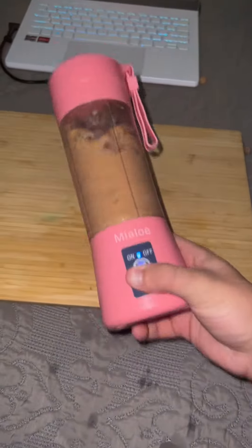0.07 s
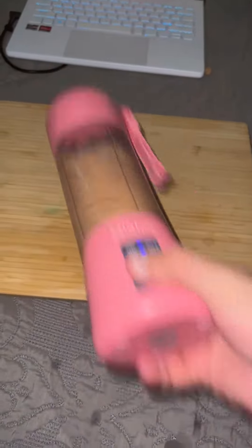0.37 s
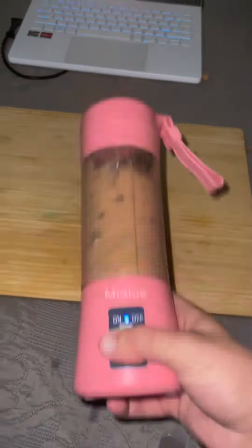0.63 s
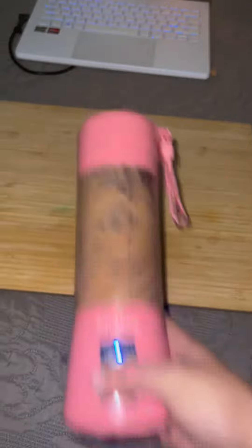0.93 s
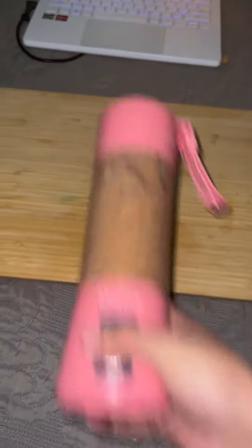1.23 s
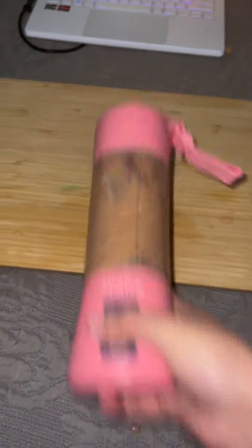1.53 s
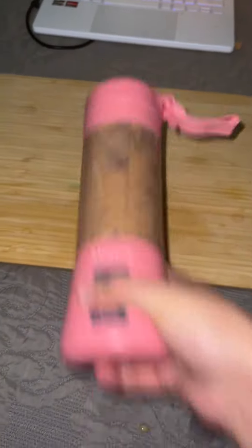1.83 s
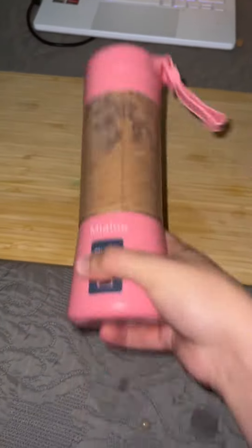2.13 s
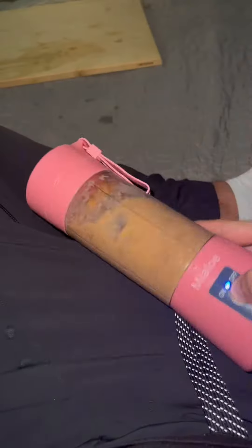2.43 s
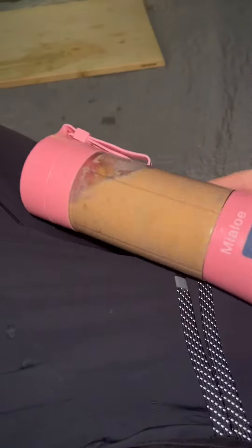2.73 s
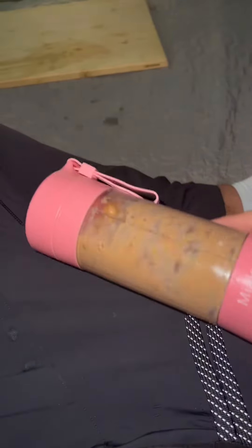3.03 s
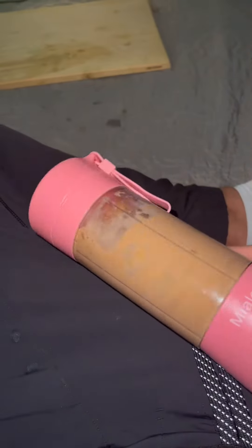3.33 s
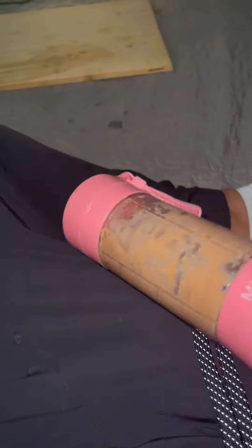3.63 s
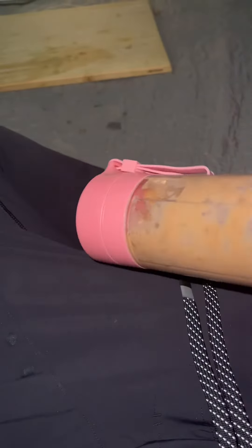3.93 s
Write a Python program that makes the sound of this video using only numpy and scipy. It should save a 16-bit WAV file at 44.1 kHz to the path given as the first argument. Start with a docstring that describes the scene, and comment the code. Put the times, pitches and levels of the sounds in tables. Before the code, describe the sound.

A portable blender bottle is shaken, thick drink sloshing and hard bits rattling inside.

```python
"""Shaking a portable blender bottle

A thick drink with hard bits is shaken upright; then, after a split second of silence, the scene changes to the
bottle churning on its side. The bits tick and knock on the plastic wall, the liquid splashes, and air pockets
gulp with a falling pitch. Near the end the churning eases and the jar rings thinly. The room rumbles faintly
underneath."""
import sys
import numpy as np
from scipy import signal
from scipy.fft import rfft, irfft
from scipy.io import wavfile

SR = 44100
rng = np.random.default_rng(int(sys.argv[2]) if len(sys.argv) > 2 else 0)


def master_out(mix):
    """Clip the mix to full scale and print it as 16-bit PCM to the path in sys.argv[1]."""
    frames = np.transpose(np.atleast_2d(mix))
    ceiling = np.clip(frames, -1, 1)
    pcm = np.round(ceiling * 32767).astype(np.int16)
    wavfile.write(sys.argv[1], SR, pcm)


N = 176400

UPRIGHT_END_S, TILTED_START_S = 2.339, 2.351
SPLASH_RISE_S, SPLASH_DECAY_S = 0.00099, 0.0032
# how hard the liquid sloshes: t/s, level/dB
SLOSH_STRENGTH = [(0.0, -33.5), (0.05, -28.5), (0.399, -29.5), (0.439, -36), (0.649, -25.5), (0.768, -34.5),
                  (0.868, -31), (0.888, -26), (1.048, -28), (1.088, -50.5), (1.117, -37), (1.147, -45),
                  (1.167, -36.5), (1.297, -26), (1.417, -35), (1.497, -32), (1.586, -28.5), (1.656, -29.5),
                  (1.686, -44.5), (1.706, -30), (1.766, -35.5), (1.906, -26.5), (2.015, -26.5),
                  (2.065, -38.5), (2.085, -30), (2.674, -25.5), (2.82, -28), (2.96, -26.5), (3.023, -28),
                  (3.118, -26), (3.143, -20.5), (3.163, -29), (3.263, -27), (3.283, -42), (3.312, -25),
                  (3.532, -29.5), (3.582, -22.5), (3.632, -40.5), (3.751, -33), (3.791, -41),
                  (3.931, -31.5), (3.991, -39)]


def amp(db):
    """Turns decibels into a gain."""
    return 10 ** (np.asarray(db) / 20)


def unit(x):
    """Scales a signal to an average power of one."""
    return x / np.sqrt(np.mean(x ** 2) + 1e-20)


def read(points, hz):
    """Reads between the rows of a table, with octaves evenly spaced."""
    f, v = np.transpose(points)
    return np.interp(np.log(hz + 1), np.log(f + 1), v)


def loudness(points):
    """Turns rows of time and decibels into a gain for every sample."""
    return amp(np.interp(np.arange(N) / SR, *np.transpose(points)))


def add(mix, start_s, sound):
    """Mixes a sound in at the given time."""
    part = mix[..., max(round(start_s * SR), 0):][..., :sound.shape[-1]]
    part += sound[..., :part.shape[-1]]


def colour(x, points, low_hz=1, high_hz=1e6):
    """Shapes the tone by a table and steeply removes what lies outside the two limits."""
    hz = abs(np.fft.fftfreq(4096, 1 / SR)) + 1
    gain = amp(read(points, hz)) / np.sqrt((1 + (low_hz / hz) ** 8) * (1 + (hz / high_hz) ** 8))
    log_gain = np.log(np.maximum(gain, 1e-5))
    taps = np.fft.ifft(np.exp(np.conj(signal.hilbert(log_gain)))).real  # rings only after a hit
    return signal.fftconvolve(x, unit(taps)[None] / np.sqrt(len(taps)), axes=1)[:, :N]


def by_position(x, upright, tilted, **limits):
    """The jar gives one tone upright and another on its side."""
    is_upright = np.arange(N) / SR < TILTED_START_S
    return np.where(is_upright, colour(x, upright, **limits), colour(x, tilted, **limits))


def even(x, smooth_s=0.063):
    """Evens out slow swells in loudness while the fine grain stays."""
    window = np.hanning(int(2 * smooth_s * SR))
    power = signal.fftconvolve(np.mean(unit(x) ** 2, 0), window / window.sum(), "same")
    return unit(x / np.sqrt(abs(power) + 0.13))


def flutter(rate_hz, depth_db):
    """A gain that wavers at random, up to about the given rate."""
    hz = np.fft.rfftfreq(N, 1 / SR)
    slow = unit(irfft(rfft(rng.standard_normal(N)) * np.exp(-(hz / rate_hz) ** 2), N))
    return unit(amp(depth_db * np.clip(slow, -2, 2)))


def scatter(per_s, spread_db):
    """Irregular events, as rows of t/s, gain and two random numbers for varying the sound."""
    draws = rng.standard_normal((2000, 4))
    times = (np.arange(len(draws)) + draws[:, 0]) / per_s
    sizes = amp(spread_db * np.clip(draws[:, 1], -2, 1.6))
    return np.column_stack([times, sizes, draws[:, 2:]])[(times > 0) & (times < N / SR)]


def narrow_noise(hz, width_hz):
    """Rubbing noise gathered around one pitch."""
    f = np.fft.rfftfreq(N, 1 / SR)
    return unit(irfft(rfft(rng.standard_normal((2, N))) / (1 + ((f - hz) / width_hz) ** 2), N))


def burst(rise_s, decay_s, hz, peak_db, octaves=0.37):
    """A brief crack of noise, strongest around hz, in two rows: direct and scattered sound."""
    t, f = np.arange(1024) / SR, np.fft.rfftfreq(1024, 1 / SR) + 1
    bump = unit(amp(peak_db * np.exp(-(np.log2(f / hz) / octaves) ** 2)))
    since_peak = t - 2 * rise_s
    envelope = np.exp(np.minimum(2 * since_peak / rise_s, -since_peak / decay_s))
    crack = irfft(rfft(rng.standard_normal((2, len(t)))) * bump) * envelope
    return crack / np.linalg.norm(crack, axis=1, keepdims=True) * np.linalg.norm(envelope)


def room_rumble():
    """The room's faint, steady, low noise."""
    # tone of the rumble: f/Hz, level/dB
    rumble_tone = [(30, -22), (80, -3), (200, -13), (1000, -38)]
    return amp(-56.5) * unit(colour(rng.standard_normal((2, N)), rumble_tone))


def sliding_hiss():
    """The contents slide along the wall with a soft hiss that swells near the end."""
    swell = np.interp(np.arange(N) / SR, [3.82, 3.915, 4.04], [0, 1, 0])
    return amp(-34) * swell * narrow_noise(hz=4500, width_hz=260)


def jar_ringing(start_s=3.63, fade_in_s=0.063):
    """The slowing contents rub the jar and bring out its own notes."""
    # notes of the jar: f/Hz, width/Hz, level/dB relative to the slosh
    jar_notes = [(468, 36, -6), (695, 45, -8), (1050, 110, -9), (1870, 55, -5)]
    rub = loudness(SLOSH_STRENGTH) * np.clip((np.arange(N) / SR - start_s) / fade_in_s, 0, 1)
    return rub * sum(amp(db) * even(narrow_noise(hz, width)) for hz, width, db in jar_notes)


def gulp(hz, rise_s=0.001853, decay_s=0.003, fall_s=0.004):
    """An air pocket rings for a few cycles while its pitch drops through hz."""
    t = np.arange(2048) / SR
    since_peak = t - 2 * rise_s
    cycles = np.cumsum(hz * np.exp(-0.4 * np.tanh(since_peak / fall_s))) / SR
    envelope = np.minimum(t / rise_s, 1) * np.exp(-np.maximum(since_peak, 0) / decay_s)
    return envelope * np.sin(2 * np.pi * (cycles + rng.random((2, 1))))


def small_gulps(typical_hz=547.6):
    """Many small air pockets gulp, more often while the bottle is upright."""
    upright, tilted = scatter(per_s=130, spread_db=2.5), scatter(per_s=42, spread_db=2.5)
    events = np.vstack([upright[upright[:, 0] < TILTED_START_S], tilted[tilted[:, 0] >= TILTED_START_S]])
    out = np.zeros((2, N))
    for at, size, pitch, _ in events:
        add(out, at, size * gulp(typical_hz * np.exp(0.32 * max(pitch, -0.7))))
    return out


def big_gulps(jar_hz=466):
    """Big air pockets sound the jar's hollow note and thump it; their wall slaps are returned apart."""
    # the biggest gulps: t/s, level/dB, f/Hz
    pockets = [(0.2712, -16, 760), (0.5803, -11.5, 650), (0.6215, -14.5, 945), (0.6377, -10.5, 557),
               (0.6508, -13, 573), (0.8764, -9, 637), (0.8997, -14.5, 560), (0.9222, -12, 900),
               (0.9696, -14.5, 615), (1.2987, -15, 650), (1.9257, -18.5, 830), (2.4132, -14, 473),
               (2.482, -19, 457), (2.586, -17, 462), (2.61, -10.5, 442), (2.6662, -13.5, 500),
               (2.7166, -17, 450), (2.788, -18, 360), (2.822, -22, 370), (3.1285, -9.5, 530),
               (3.136, -11.5, 965), (3.191, -15, 476), (3.2188, -16.5, 426), (3.5252, -16.5, 490),
               (3.5781, -16.5, 485)]
    # tone of a gulp's push on the jar: f/Hz, level/dB
    thump_tone = [(60, -28), (170, -12.5), (260, 6.5), (1000, -4)]
    gulps, slaps = np.zeros((2, 2, N))
    for at, db, hz in pockets:
        add(gulps, at, amp(db - 2.5) * gulp(hz))
        slap_db = 2 * db + 5  # a bigger gulp slaps much harder
        add(slaps, at, amp(slap_db) * burst(SPLASH_RISE_S, SPLASH_DECAY_S, hz=1110, peak_db=4))
    hollow_note = signal.lfilter(*signal.iirpeak(jar_hz, Q=12, fs=SR), gulps)
    thumps = amp(-9.5) * colour(slaps, thump_tone, high_hz=1330)
    return gulps + hollow_note + thumps, slaps


def liquid_splashes(typical_hz=3400):
    """The drink breaks into short splashes, some dull and some bright."""
    out = np.zeros((2, N))
    for at, size, _, brightness in scatter(per_s=85, spread_db=1.8):
        hz = typical_hz * np.exp(0.68 * brightness)
        add(out, at, size * burst(SPLASH_RISE_S, SPLASH_DECAY_S, hz, peak_db=5))
    return out


def liquid_slosh(churn, splashes, ticks, gulps):
    """The low voice of the moving drink: muffled churning with small gulps in it."""
    # tone of the liquid in the jar, upright and on its side: f/Hz, level/dB
    upright = [(71, -41), (120, -38), (156, -25), (260, -20), (420, -5), (720, -2.5), (1030, -1.5),
               (1320, -6), (1500, -10), (1950, -17), (3300, -120)]
    tilted = [(90, -27.5), (231, -24), (450, -1.5), (532, -1.5), (631, -11), (739, -9), (952, -3),
              (1500, -8), (1950, -44), (3300, -120)]
    stirred = unit(churn + 0.87 * unit(splashes) + 0.5 * unit(ticks))
    body = by_position(stirred, upright, tilted, high_hz=1450)
    bubbling = by_position(gulps, upright, tilted)
    return loudness(SLOSH_STRENGTH) * (amp(-3.5) * even(body) + amp(-4.5) * even(bubbling))


def bit_ticks(typical_hz=6400, rise_s=0.00025, typical_decay_s=0.0011):
    """Hard bits tap the wall in a dense stream of tiny ticks."""
    out = np.zeros((2, N))
    for at, size, pitch, length in scatter(per_s=185, spread_db=6):
        hz = typical_hz * np.exp(0.4 * max(pitch, -1))
        decay_s = typical_decay_s * np.exp(0.64 * length)
        add(out, at, size * burst(rise_s, decay_s, hz, peak_db=10.5))
    return out


def wall_rattle(fizz, splashes, ticks, slaps):
    """The plastic wall passes on the bright part of whatever hits it."""
    # how hard the bits rattle: t/s, level/dB
    strength = [(0.0, -29), (0.06, -22.5), (0.19, -26), (0.399, -22), (0.429, -25), (0.539, -25.5),
                (0.619, -23.5), (0.868, -26.5), (0.885, -23.5), (1.018, -24.5), (1.088, -35),
                (1.155, -34.5), (1.2, -28), (1.327, -25.5), (1.407, -31), (1.427, -29), (1.656, -26),
                (1.686, -34.5), (1.736, -27), (1.766, -32.5), (1.836, -23.5), (1.916, -28), (2.005, -22.5),
                (2.055, -31.5), (2.075, -26.5), (2.115, -27), (2.235, -26.5), (2.295, -24), (2.345, -29.5),
                (2.395, -22), (2.464, -25.5), (2.745, -20.5), (2.762, -28), (2.953, -22.5), (3.113, -30.5),
                (3.133, -24), (3.233, -33.5), (3.302, -28), (3.462, -27), (3.492, -31.5), (3.592, -25),
                (3.652, -41.5), (3.672, -29.5), (3.771, -36), (3.931, -31), (3.991, -36)]
    # tone of the wall, upright and on its side: f/Hz, level/dB
    upright = [(820, -30.5), (1400, -4), (1920, 1), (2430, 2), (2690, -1.5), (4120, -2.5), (6140, -1.5),
               (7450, -1.5), (10900, -9.5), (12900, -19.5), (14600, -18), (16000, -30)]
    tilted = [(820, -22), (1400, -11), (1700, 0.5), (2480, 1.5), (2950, -2.5), (3540, 0), (4960, -6.5),
              (5950, -1), (6660, -4.5), (8860, -5), (11700, -20.5), (14700, -30), (16000, -39)]
    patter = amp(-5) * even(ticks) + amp(-6) * even(splashes) + amp(-7.5) * even(fizz)
    return by_position(slaps + loudness(strength) * patter, upright, tilted, low_hz=1340)


def hard_knocks(rise_s=0.00023, wall_hz=3560):
    """Hard bits snap against the wall and throw spatter; with the bottle on its side the wall rings."""
    # the hardest knocks: t/s, level/dB, brightest f/Hz
    hits = [(0.0807, -10, 7370.0), (0.1397, -7, 5950), (0.188, -13, 5530.0), (0.2588, -10, 7000),
            (0.3313, -9.5, 8100), (0.365, -11, 5370.0), (0.5457, -10.5, 5900), (0.569, -9, 6500),
            (0.5995, -11.5, 6760), (0.6664, -6.5, 7690.0), (0.7547, -9, 7840), (0.819, -14, 3970),
            (0.8778, -11, 6560.0), (0.8866, -7, 6460), (0.931, -11, 5840.0), (1.0475, -15.5, 6680.0),
            (1.2462, -10, 7110.0), (1.315, -8, 6400), (1.335, -12.5, 6990.0), (1.382, -17, 7000.0),
            (1.4264, -12, 6800), (1.5358, -12, 6050.0), (1.5744, -11, 5540), (1.6245, -10.5, 7250),
            (1.6394, -23, 6310), (1.703, -21, 3000), (1.7447, -15.5, 7170), (1.8252, -15.5, 3500),
            (1.8317, -10.5, 6800), (1.8941, -10.5, 6800), (1.9003, -14, 6860), (1.908, -12.5, 6440),
            (1.931, -9.5, 7570.0), (1.954, -14, 7280.0), (1.974, -13.5, 6430), (2.0692, -14, 7050),
            (2.167, -10, 7100), (2.1915, -9.5, 6093), (2.2867, -7.5, 3370), (2.355, -12.0, 7550),
            (2.381, -11.5, 3800.0), (2.3946, -6.5, 6940.0), (2.399, -9, 7400), (2.4522, -12, 5220.0),
            (2.4791, -10.5, 6400), (2.5383, -8.5, 7860.0), (2.584, -14, 4000.0), (2.649, -12, 5450),
            (2.6814, -8.5, 6290.0), (2.6913, -9, 7100), (2.749, -6.5, 5070.0), (2.8167, -10.5, 3900),
            (2.85, -9.5, 7120.0), (2.8928, -8.5, 6610.0), (2.966, -10, 6200), (3.153, -11, 7600),
            (3.184, -11.5, 4760), (3.2523, -12.5, 4100), (3.2693, -13, 7400), (3.303, -14.5, 3660),
            (3.341, -12.5, 2930), (3.3517, -9.5, 5165), (3.4, -14.5, 2190), (3.419, -11, 7200),
            (3.4555, -9.5, 6460), (3.4657, -8.5, 5550), (3.545, -19.5, 3600), (3.5955, -13, 7440),
            (3.679, -20.5, 2520), (3.701, -18, 6950), (3.719, -18.5, 6270), (3.8049, -20.5, 4300),
            (3.8212, -26, 4290), (3.847, -19, 4570)]
    # tone of a knock: f/Hz, level/dB
    knock_tone = [(400, -6), (1000, 1), (2200, 3), (5000, -3.5), (8500, 2), (11000, -1), (13000, -10),
                  (15500, -6.5)]
    knocks = np.zeros((2, N))
    for at, db, hz in hits:
        snap = burst(rise_s, decay_s=0.0005, hz=hz, peak_db=20, octaves=0.92)
        spatter = burst(rise_s, SPLASH_DECAY_S, hz=1100, peak_db=9)
        add(knocks, at, amp(db) * (snap + amp(-11) * spatter))
    is_tilted = np.arange(N) / SR > TILTED_START_S
    ring = amp(4) * signal.lfilter(*signal.iirpeak(wall_hz, Q=11, fs=SR), knocks * is_tilted)
    return colour(knocks + ring, knock_tone, low_hz=347)


def microphones(x):
    """Two close microphones hear direct sound slightly out of step, scattered sound with opposite signs."""
    # how far the left side runs ahead: f/Hz, phase/rad
    left_lead = [(100, 0), (650, -.4), (1050, .2), (2600, -.1), (3400, .6), (4700, .1), (5500, -.8),
                 (6600, -1.25), (16000, -1.35)]
    # how much louder the left side is: f/Hz, level/dB
    balance = [(60, 0), (170, -3), (330, -1), (640, -8), (1410, -2.5), (3100, 0), (6800, 0.5),
               (15000, -0.5)]
    # strength of the scattered sound: f/Hz, level/dB
    scattered_tone = [(100, -15.5), (500, -15), (1900, -33), (2900, -3.5), (5000, -8), (6000, -5.5),
                      (10000, -14), (13000, -6)]
    hz = np.fft.rfftfreq(N, 1 / SR)
    direct, scattered = rfft(x)
    left_over_right = amp(read(balance, hz)) * np.exp(1j * read(left_lead, hz))
    side = direct * (left_over_right - 1) / (left_over_right + 1)
    side += scattered * amp(read(scattered_tone, hz))
    return irfft(np.array([direct + side, direct - side]), N)


def room_echo(x, fade_s=0.16):
    """A furnished room answers with a short, faint echo."""
    t = np.arange(SR // 3) / SR
    tail = rng.standard_normal((2, len(t))) * amp(-60 * t / fade_s) * (t > 0.003)
    return amp(-17) * signal.fftconvolve(x, tail / np.linalg.norm(tail[0]), axes=1)[:, :N]


def scene():
    """The bottle close up in a room; the same ticks and splashes sound in both wall and liquid."""
    ticks, splashes, gulps = bit_ticks(), liquid_splashes(), small_gulps()
    glugs, slaps = big_gulps()
    fizz, churn = rng.standard_normal((2, 2, N)) * flutter(rate_hz=90, depth_db=2.5)
    wall = wall_rattle(fizz, splashes, ticks, slaps) + hard_knocks()
    liquid = liquid_slosh(churn, splashes, ticks, gulps) + glugs
    near = microphones(wall + liquid + jar_ringing() + sliding_hiss() + room_rumble())
    return near + room_echo(near)


def record(dry, fade_s=0.0059, top_hz=16000):
    """Goes silent between the two positions, rounds off loud peaks and removes the highest treble."""
    t = np.arange(N) / SR
    gate = np.clip(np.maximum(UPRIGHT_END_S - t, t - TILTED_START_S) / fade_s, 0, 1)
    rounded = dry / (1 + abs(dry) ** 6) ** (1 / 6)
    low_pass = signal.firwin(401, top_hz, window=("kaiser", 8), fs=SR)
    return signal.oaconvolve(gate * rounded, low_pass[None], "same")


dry = scene()
out = record(dry)
master_out(out)
```